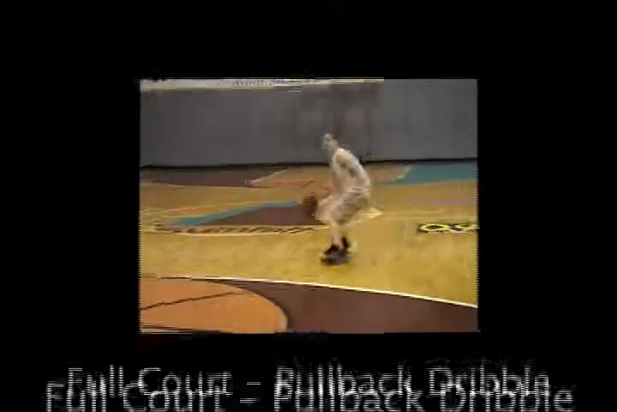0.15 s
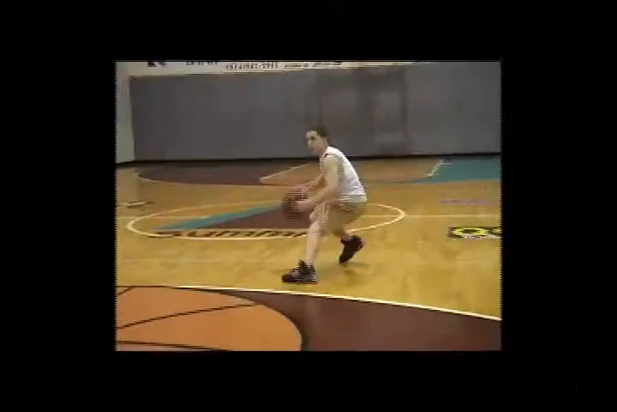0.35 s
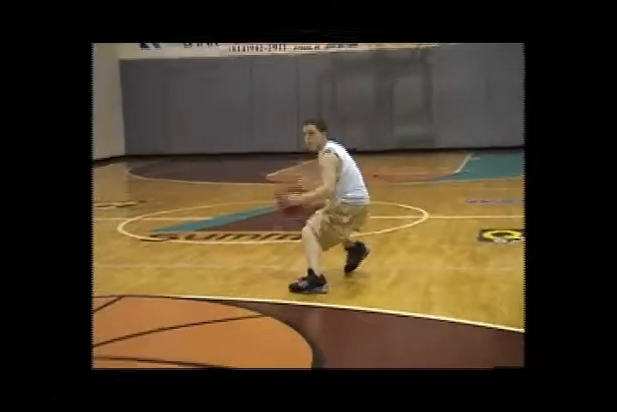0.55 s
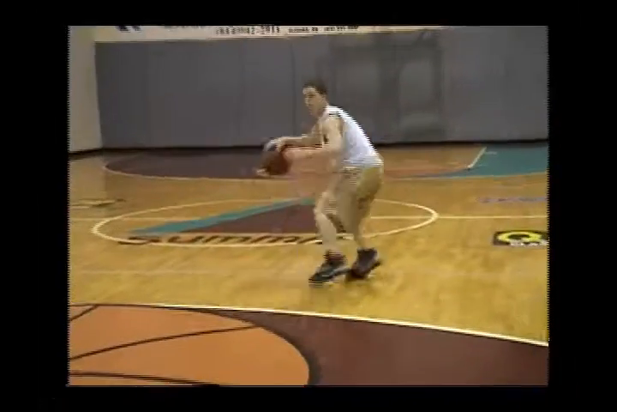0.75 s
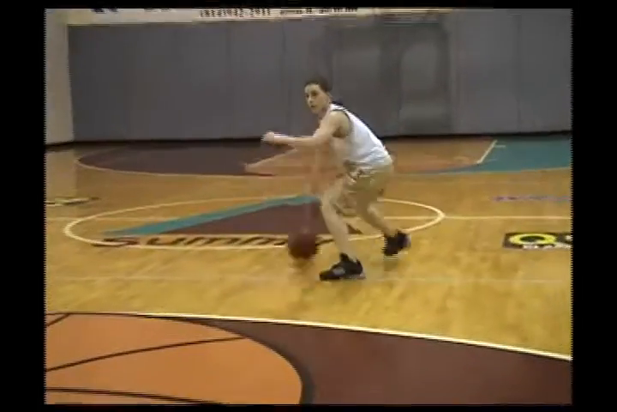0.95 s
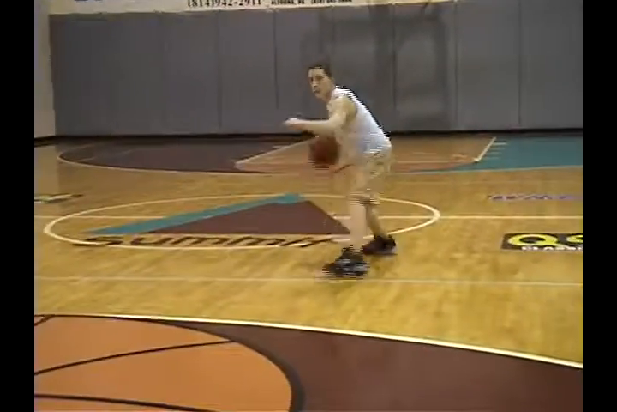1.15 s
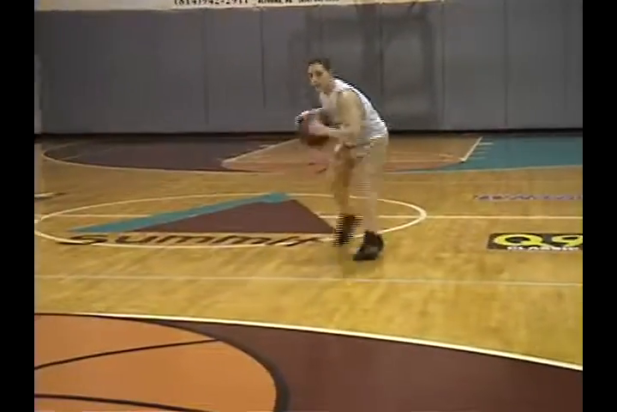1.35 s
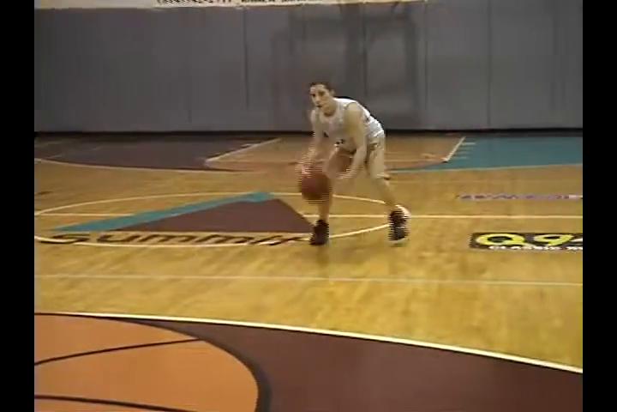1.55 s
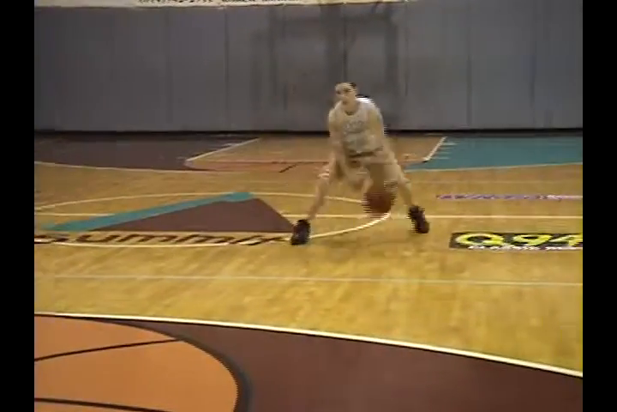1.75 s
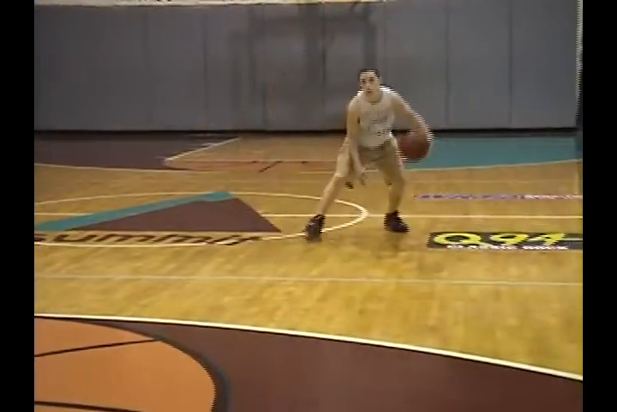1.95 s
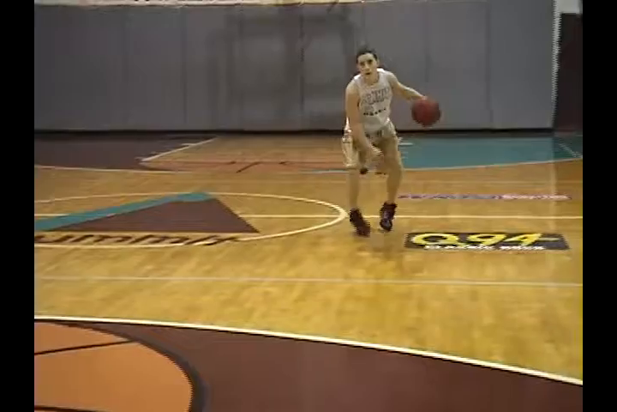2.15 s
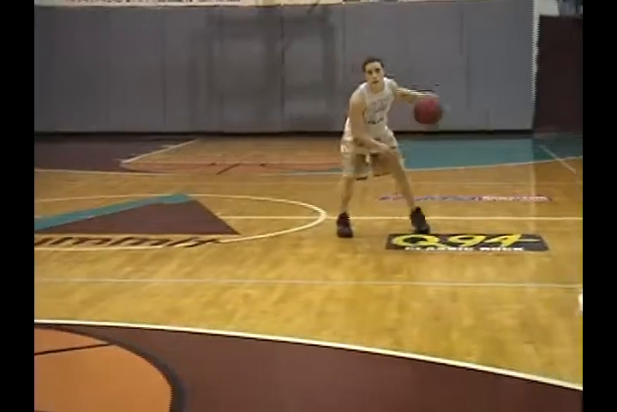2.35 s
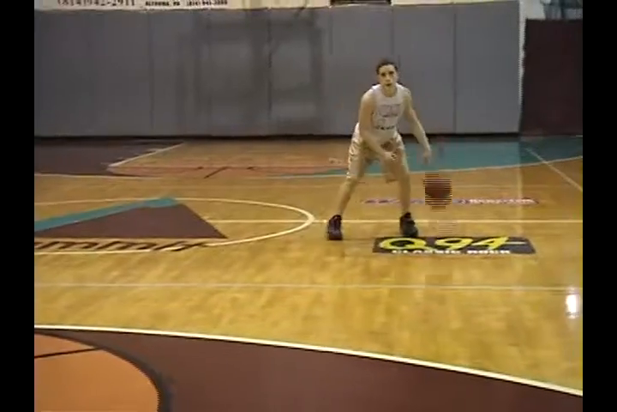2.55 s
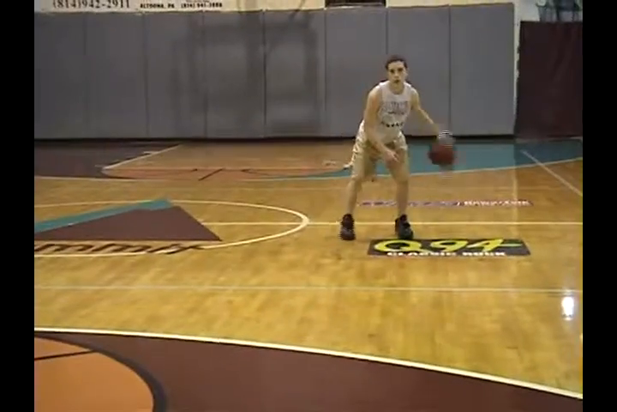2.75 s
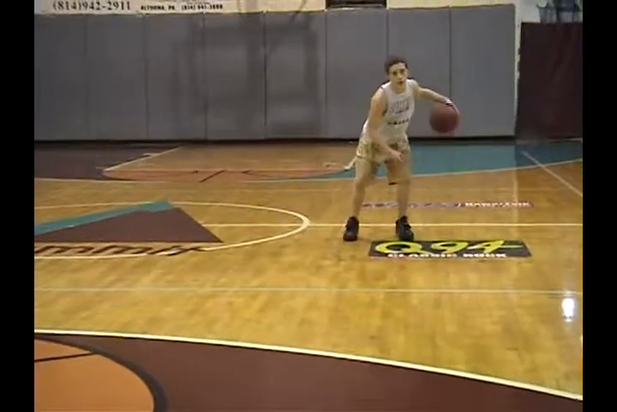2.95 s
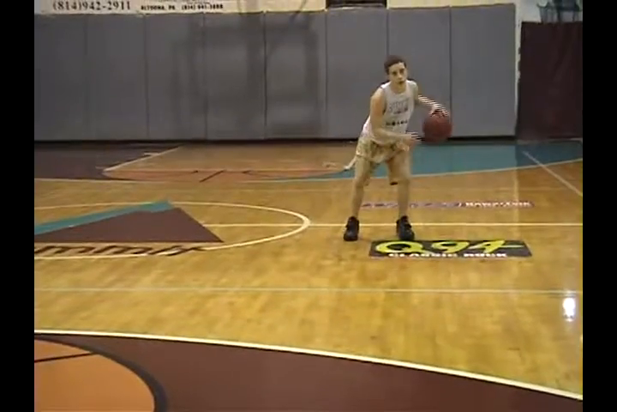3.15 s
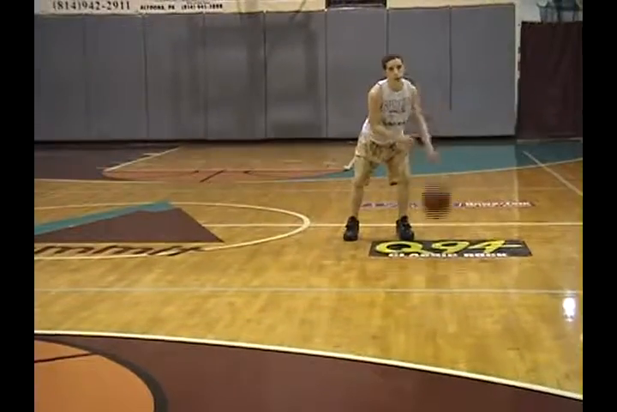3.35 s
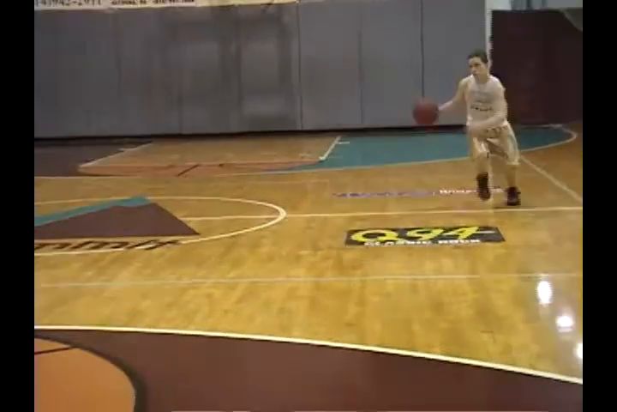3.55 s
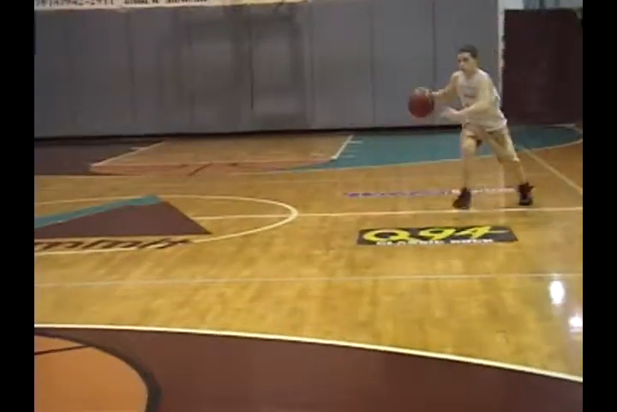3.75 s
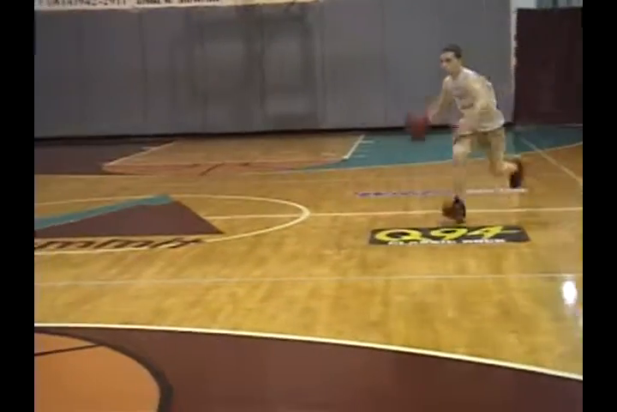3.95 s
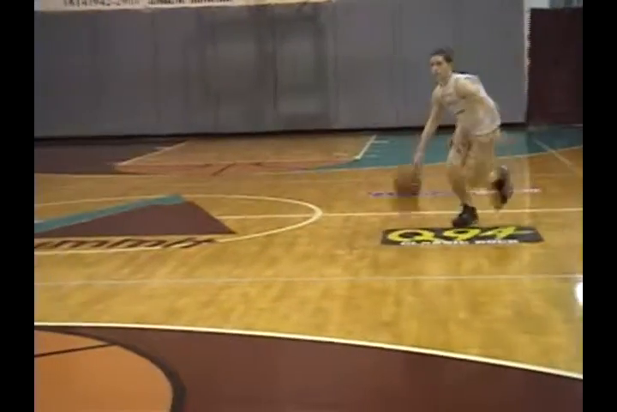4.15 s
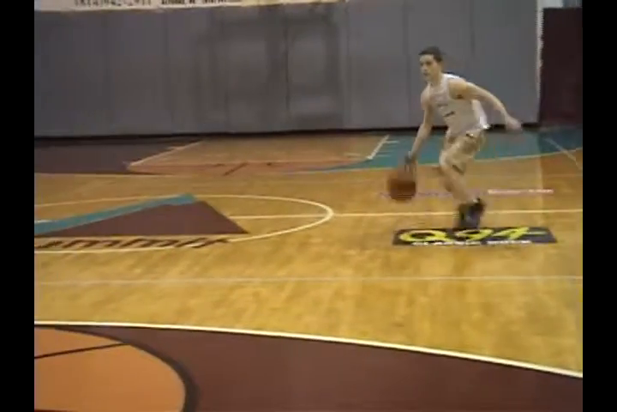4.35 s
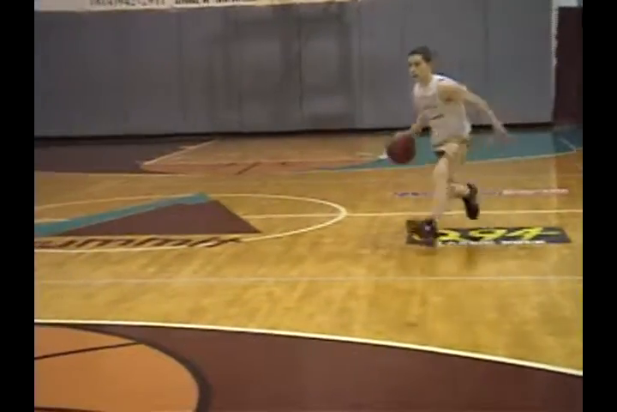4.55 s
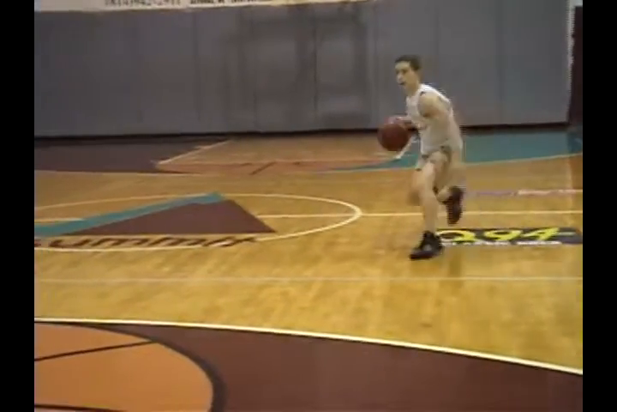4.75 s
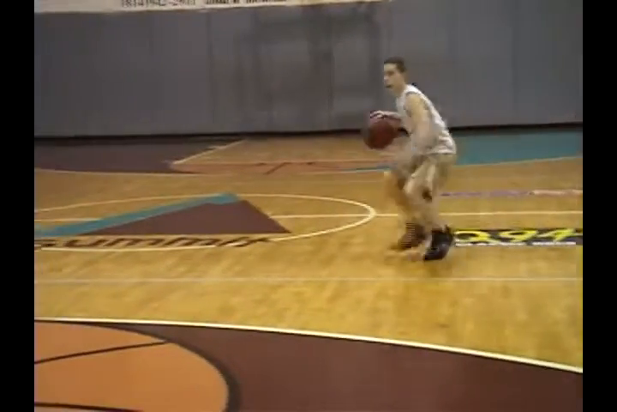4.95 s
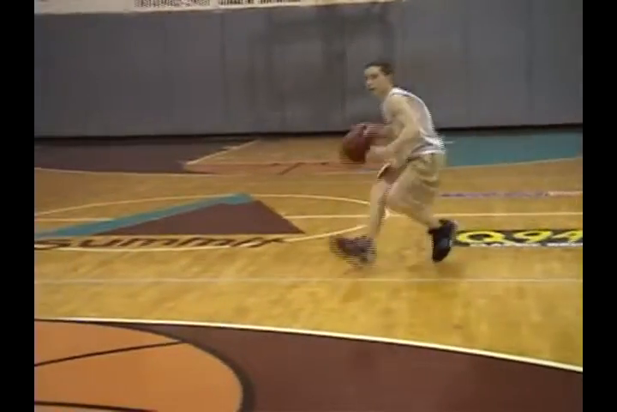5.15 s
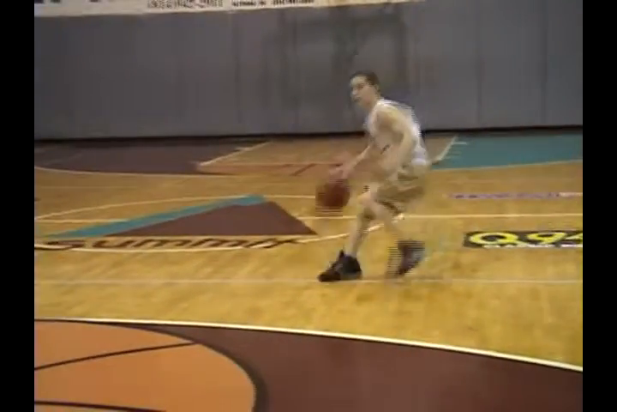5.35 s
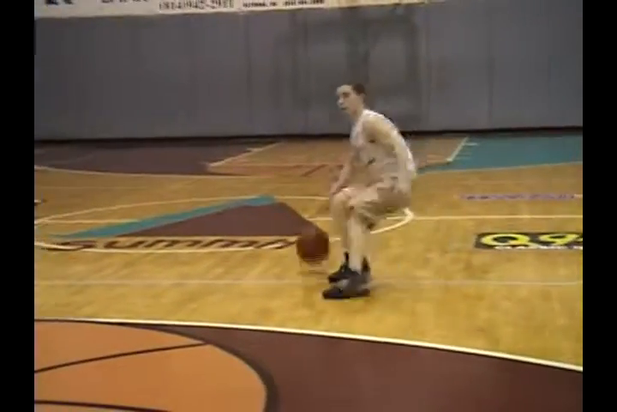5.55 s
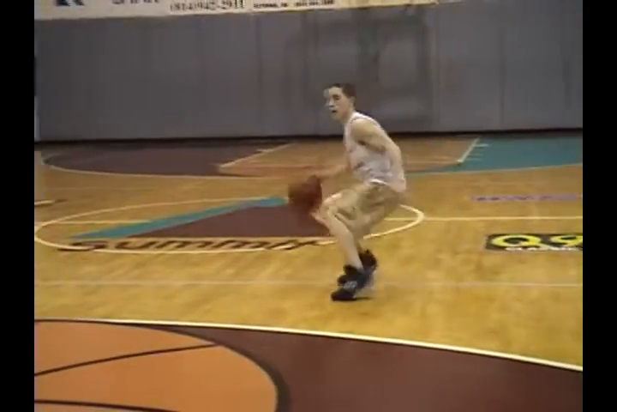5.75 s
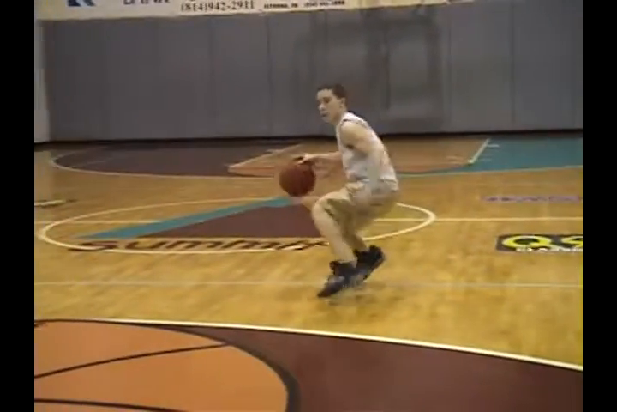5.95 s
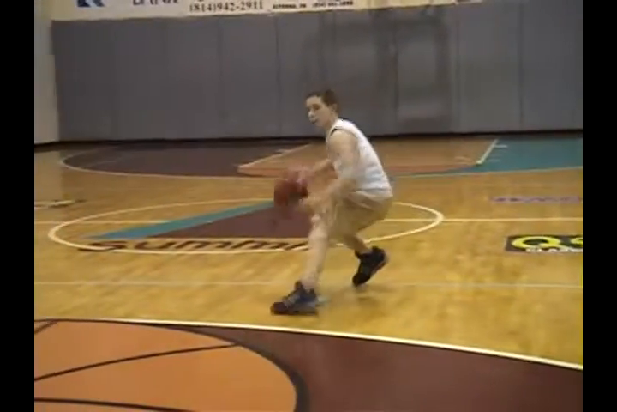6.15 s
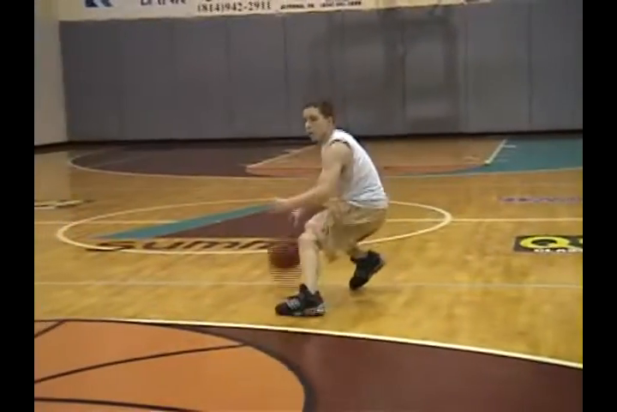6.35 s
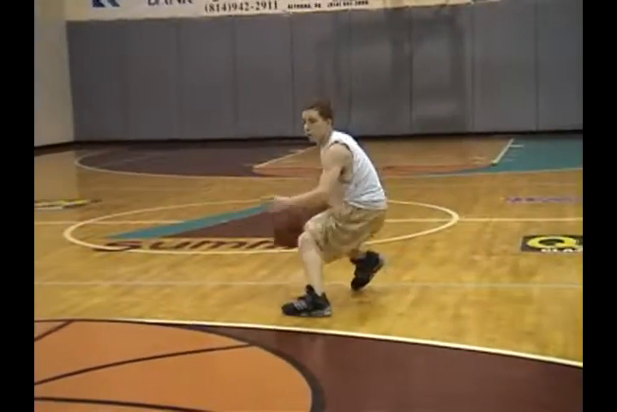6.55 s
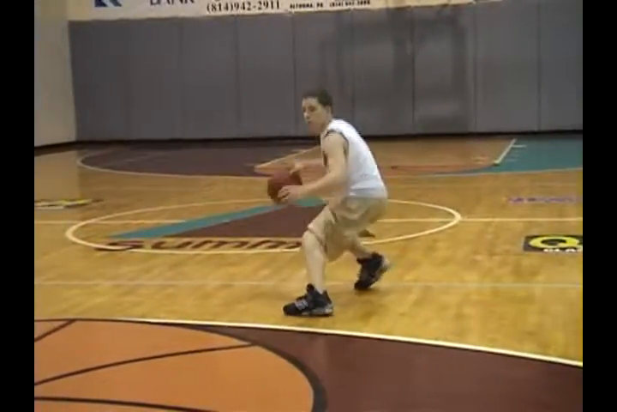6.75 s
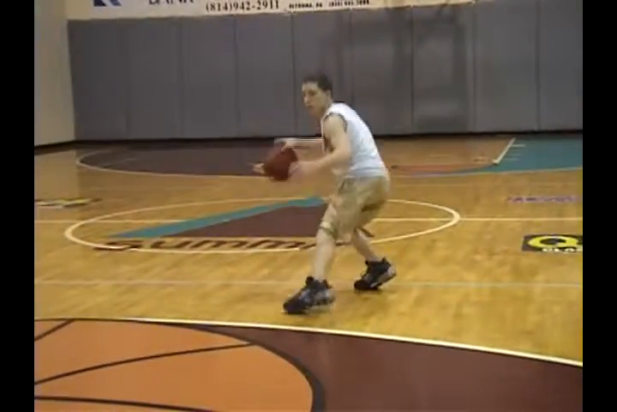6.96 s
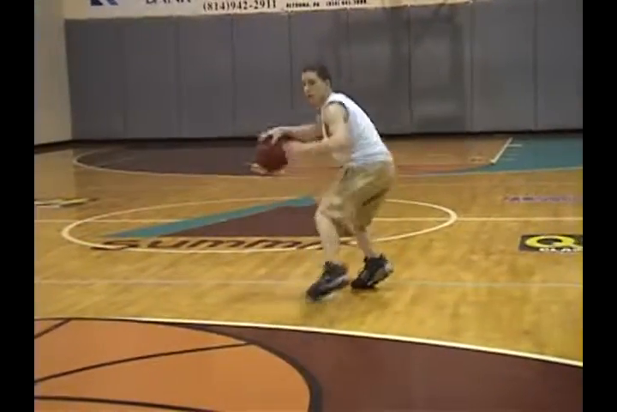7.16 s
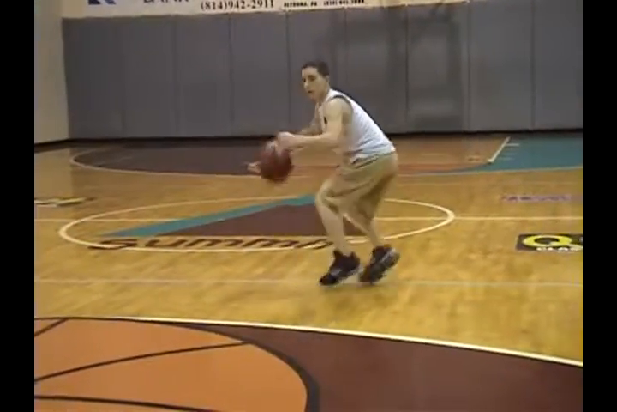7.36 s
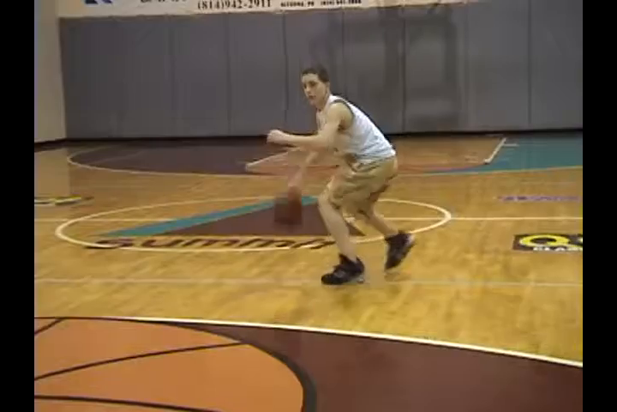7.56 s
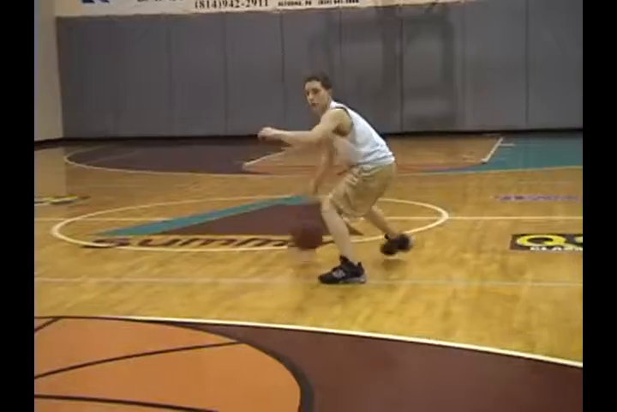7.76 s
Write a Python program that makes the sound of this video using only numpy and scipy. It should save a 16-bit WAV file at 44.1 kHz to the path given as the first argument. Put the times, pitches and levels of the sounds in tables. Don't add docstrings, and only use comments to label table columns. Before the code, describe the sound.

In a large hard-walled gym, a basketball hits sprung hardwood six times at uneven intervals, each a hard slap with low thump, hollow ring, wall slapback and long tail. Shoes tap and briefly squeak near the start. Ventilation rushes under a thin camera whine. Partway through, everything cuts to slow motion: deeper, much quieter, stretched bounces and shoe scuffs. The camera microphone slightly overloads on loud hits.

```python
import sys
import numpy as np
from scipy import signal
from scipy.io import wavfile

SR = 44100
rng = np.random.default_rng(int(sys.argv[2]) if len(sys.argv) > 2 else 0)


def dump(signal):
    limited = np.clip(np.atleast_2d(signal).T, -1, 1)
    pcm = np.round(limited * 32767).astype(np.int16)
    wavfile.write(sys.argv[1], SR, pcm)


def boost(x):
    u = np.asarray(x, float) / 20
    return 10 ** u


N = 344862

CUT_S, LEAD_S = 3.6122, .8
SPEED, SLOW_AT_S, SAME_AS_S = .4005, 5.6757, .1866
M = round((CUT_S + LEAD_S) * SR)
MODE_SPREAD_DB = 2.5

# (time [s], slap peak [dB], thump [dB], top [dB], delay of the nearest big wall [s])
BOUNCES = [
    (0.187, -1.5, -11.5, -18, .0377),
    (0.5408, -2.5, -17.5, -19.5, .0377),
    (1.0624, -1.5, -17, -21, .0358),
    (1.7802, -6.5, -19.5, -23, .0367),
    (2.7184, -3.5, -15, -16, .0408),
    (3.5114, -1.5, -18, -21, .0400),
]
# (time [s], slap peak [dB], thump [dB], top [dB], wall delay [s])
SLOW_BOUNCES = [
    (3.300, -1, -14.5, -18, .039),
    (4.402, 2, -11.5, -16.5, .0394),
]


def live_time(s):
    return SAME_AS_S + (s - SLOW_AT_S) * SPEED


def merged(rows, slow_rows):
    table = np.array([(live_time(s), *rest) for s, *rest in slow_rows] + list(rows))
    at = np.round((table[:, 0] + LEAD_S) * SR).astype(int)
    return (at, *table[:, 1:].T)


def clicks(at, db):
    out = np.full(M, 1e-18)
    out[at] += boost(db)
    return out


def at_hz(points, hz):
    points = np.array(points)
    return np.interp(np.log(hz), np.log(points[:, 0]), points[:, 1])


def band(x, low_hz, high_hz):
    return signal.sosfilt(signal.butter(2, [low_hz, min(high_hz, .45 * SR)], "band", fs=SR, output="sos"), x)


def fading(x, t60):
    return signal.lfilter([1], [1, -boost(-60 / (t60 * SR))], x)


def struck(at, db, modes, spread_db):
    out = 0
    chance = rng.standard_normal((len(at), len(modes)))
    for k, (hz, mode_db, t60) in enumerate(modes):
        r, w = boost(-60 / (t60 * SR)), 2 * np.pi * hz / SR
        blows = clicks(at, db + mode_db + spread_db * chance[:, k])
        out = out + signal.lfilter([0, np.sin(w)], [1, -2 * r * np.cos(w), r * r], blows)
    rubber_hz = 5000
    return signal.lfilter(*signal.butter(2, rubber_hz, fs=SR), out)


def bank(shape):
    out = 0
    white = rng.standard_normal((2, M))
    edges = 22 * 2 ** np.arange(0, 9.8, 1 / 3)
    for k, (low, high) in enumerate(zip(edges, edges[1:])):
        out = out + shape(np.sqrt(low * high)) * band(white[k % 2], low, high)
    return out


def background():
    # (frequency [Hz], density [dB per Hz])
    ventilation = [(12, -34), (20, -8.5), (161, 1.5), (232, 2), (289, -3), (352, 0), (404, -8), (505, -4.5),
                   (2540, -28.5), (4190, -31), (4810, -43), (6720, -31.5), (7520, -39), (15500, -49.5)]
    # (frequency [Hz], width [Hz], level [dB])
    hums = [
        (117, 3, -45),
        (6600, 500, -68),
        (15625, 8, -83),
    ]
    # (frequency [Hz], level [dB rms])
    whine = [(4043, -65), (4544, -70.5), (5760, -74), (6239, -67), (6422, -75.5), (6481, -68.5),
             (6718, -81), (6842, -74)]
    ventilation_db = -33.5
    out = bank(lambda hz: boost(at_hz(ventilation, hz)))
    out = boost(ventilation_db) * out / np.std(out)
    for hz, width, db in hums:
        hum = band(rng.standard_normal(M), hz - width / 2, hz + width / 2)
        out += boost(db) * hum / np.std(hum)
    for hz, db in whine:
        out += boost(db + 4.5) * np.sin(2 * np.pi * (hz * np.arange(M) / SR + rng.random()))
    return out


def bursts():
    # (time [s], peak [dB], knock [dB], top [dB], length [s])
    steps = [
        (.105, -5.5, -20, -18, 0.0008),
        (.110, -9.5, -11.5, -24, 0.0025),
        (.4245, -14, -28, -33.5, 0.0004),
        (.430, -30, -39, -39, 0.012),
        (.452, -19, -44.5, -51, 0.0042),
        (1.025, -14.5, -19.5, -42, 0.0033),
    ]
    # (time [s], peak [dB], knock [dB], top [dB], length [s])
    slow_steps = [
        (3.917, -31, -37, -50, 0.002),
        (4.483, -11, -30, -42, 0.0014),
        (4.590, -15.5, -30, -43, .012),
        (4.632, -12.5, -24, -46, .016),
        (4.756, -16, -24, -48, 0.007),
        (4.836, -10, -15, -14, 0.0016),
        (4.843, -13, -8, -24, 0.003),
        (4.899, -36.5, -34, -35, 0.001),
        (4.936, -4, -22, -32, .001),
        (5.093, -20, -22, -42, 0.0025),
    ]
    # (peak [dB], knock [dB], top [dB], hall [dB], length [s])
    second_trip = (-19, -29, -35, -33, .005)
    far_wall = (-21, -28, -33, -30, .012)
    second_trip_lag, far_wall_s = 1.92, .089
    facing_s, aside_db_per_ms = .040, 3
    knock_hall_db, scuff_hall_db = -14, -10
    step_wall_s, peak_loss_db, knock_loss_db, top_loss_db = .0398, 8, 14, 15

    at, peak_db, knock_db, top_db, length = merged(steps, slow_steps)
    knock_energy = boost(2 * (knock_db + knock_hall_db))
    scuff_energy = boost(2 * (peak_db + scuff_hall_db)) * (length / .01) ** 2
    hall_db = 10 * np.log10(knock_energy + scuff_energy)
    rows = list(zip(at, peak_db, knock_db, top_db, hall_db, length))
    rows += zip(at + step_wall_s * SR, peak_db - peak_loss_db, knock_db - knock_loss_db,
                top_db - top_loss_db, hall_db - knock_loss_db, length)
    for i, slap_db, _, _, wall_s in zip(*merged(BOUNCES, SLOW_BOUNCES)):
        aside_db = aside_db_per_ms * min(wall_s - facing_s, 0) * 1000
        returns = [(second_trip_lag * wall_s, slap_db + aside_db, second_trip), (far_wall_s, slap_db, far_wall)]
        for lag_s, db, (*below_db, smear_s) in returns:
            rows.append((i + lag_s * SR, *(db + np.array(below_db)), smear_s))
    at, *columns = np.transpose(rows)
    return at.astype(int), *columns


def shoes():
    # (frequency [Hz], level [dB], t60 [s])
    sole_modes = [(230, 2.5, 0.065), (485, 3, .03), (907, 6.5, 0.023), (1535, -1, .015)]
    at, peak_db, knock_db, top_db, hall_db, length = bursts()
    mid = band(band(rng.standard_normal(M), 1200, 5740), 1200, 5740)
    top = band(band(rng.standard_normal(M), 5500, 11000), 5500, 11000)
    out = struck(at, knock_db, sole_modes, MODE_SPREAD_DB)
    for i, mid_db, bright_db, s in zip(at, peak_db, top_db, length):
        u = np.arange(min(round(.06 * SR), M - i)) / SR / max(s, .0003)
        contact = np.exp(-u ** 2) * np.minimum(1, 11.0 * u + .3)
        span = slice(i, i + len(u))
        out[span] += contact * (boost(mid_db) * mid[span] + boost(bright_db) * top[span])
    return out, clicks(at, 2 * hall_db)


def ball():
    # (frequency [Hz], level [dB], t60 [s])
    thump_modes = [(132, -12.5, 0.11), (164, -9, 0.1), (205, -9, 0.061), (256, -6, .08), (307, -13, .05),
                   (440, -18, 0.032)]
    # (frequency [Hz], level [dB], t60 [s])
    air_modes = [(540, -4, 0.016), (700, -9.5, .015), (890, -5, .02), (1120, -3, 0.05), (1320, 0, 0.016),
                 (1764, -1, .015), (2000, -6, .012), (2440, -3.5, .012), (3200, -8.5, 0.013),
                 (3800, 0.5, 0.0045)]
    # (delay [s], level [dB])
    boom_echoes = [(0.015, -9.5), (.078, -11), (.096, -9.5), (.112, -11), (0.151, -13), (0.194, -13.5)]
    wall_loss_db = np.array([2.5, 6, 17, 4])
    wall_ring_loss_db = 4
    contact_hz = 200
    thump_lag_s = .0014
    near_echo_s, near_echo_db, echo_top_hz = .0115, -9, 6200
    wall_near_echo_db = -8
    hall_under_slap_db = 23

    hit, slap_db, thump_db, top_db, wall_s = merged(BOUNCES, SLOW_BOUNCES)
    direct = np.array([slap_db, thump_db, top_db, slap_db - hall_under_slap_db])
    at = np.r_[hit, hit + np.round(wall_s * SR).astype(int)]
    slap_db, thump_db, top_db, hall_db = np.c_[direct, direct - wall_loss_db[:, None]]
    is_return = np.arange(len(at)) >= len(hit)

    slap = band(band(clicks(at, slap_db + 7), 750, 4100), 470, 7700)
    rattle_noise = band(band(rng.standard_normal(M), 500, 4500), 430, 6500)
    rattle = fading(clicks(at, slap_db - 7.5), 0.015) * rattle_noise
    crackle_noise = band(band(rng.standard_normal(M), 5500, 12000), 5500, 13000)
    crackle = fading(clicks(at, top_db + 7), 0.014) * crackle_noise
    ring = struck(at, slap_db - 9 - wall_ring_loss_db * is_return, air_modes, MODE_SPREAD_DB)
    bright = slap + rattle + crackle + ring

    push = struck(at + round(thump_lag_s * SR), thump_db + 14, thump_modes, MODE_SPREAD_DB / 2)
    thump = -signal.lfilter(*signal.butter(2, contact_hz, fs=SR), push)
    thump = thump + sum(boost(db) * np.r_[np.zeros(round(s * SR)), thump][:M] for s, db in boom_echoes)

    lag = round(near_echo_s * SR)
    order = np.searchsorted(np.sort(at), np.arange(M), "right") - 1
    latest = np.argsort(at)[np.maximum(order, 0)]
    facing = bright * np.where(latest < len(hit), 1, boost(wall_near_echo_db))
    echo = band(np.r_[np.zeros(lag), facing[:-lag]], 300, echo_top_hz)
    return bright + thump - boost(near_echo_db) * echo, clicks(at, 2 * hall_db)


def hall(energy):
    # (frequency [Hz], density [dB per Hz])
    hall_colour = [(30, -39), (60, -8.5), (100, -1.5), (140, -0.5), (240, -1.5), (300, -11), (420, -9),
                   (600, -10), (830, -15), (1110, -12.5), (1600, -16), (3400, -23.5), (10300, -42),
                   (14500, -67)]
    # (frequency [Hz], t60 [s])
    hall_t60 = [(60, 3.3), (160, 1.2), (420, 1.5), (1100, 2.22), (2900, 2.8), (7700, 1.4), (11000, 0.23),
                (14000, 0.35)]
    build_up_s, early_t60_s, early_db = 0.047, 0.56, 2
    clump_hz, clump_db = 67, 2.5
    filled = fading(energy, build_up_s * np.log(1000)) / (build_up_s * SR)
    clumps = band(rng.standard_normal(M), 4.1, clump_hz)
    lumpy = boost(2 * (early_db + clump_db * clumps / np.std(clumps)))
    early = lumpy * fading(filled, early_t60_s / 2)

    def gain(hz):
        return boost(at_hz(hall_colour, hz)) * np.sqrt(early + fading(filled, at_hz(hall_t60, hz) / 2))

    return boost(18.5) * bank(gain)


def squeak():
    partials_db = [1, 0, 0, -8]
    start_s, length_s = .4516, .0066
    first_hz, last_hz, level_db = 2750, 1945, -19
    u = np.arange(round(length_s * SR)) / (length_s * SR)
    roughness_hz = 1100 * rng.standard_normal(len(u))
    phase = 2 * np.pi * np.cumsum(first_hz + (last_hz - first_hz) * u + roughness_hz) / SR
    tone = sum(boost(db) * np.sin((k + 1) * phase) for k, db in enumerate(partials_db))
    out = np.zeros(M)
    i = round((start_s + LEAD_S) * SR)
    out[i:i + len(u)] = boost(level_db) * np.sin(np.pi * u ** .7) * tone
    return band(band(out, 1800, 11000), 1800, 11000)


def scene():
    mic_low_hz, top_hz, slow_db = 97, 15900, -15
    bounces, ball_energy = ball()
    footwork, shoe_energy = shoes()
    played = bounces + footwork + squeak() + hall(ball_energy + shoe_energy)
    gym = signal.sosfilt(signal.butter(2, mic_low_hz, "high", fs=SR, output="sos"), played) + background()
    gym = 1.108 * np.tanh(gym / 1.094)
    gym = signal.sosfilt(signal.cheby2(10, 60, top_hz + 1300, fs=SR, output="sos"), gym)
    s = np.arange(N) / SR
    slowed = s >= CUT_S
    fine = signal.resample_poly(gym, 4, 1)
    read = 4 * SR * (LEAD_S + np.where(slowed, live_time(s), s))
    return (np.interp(read, np.arange(len(fine)), fine) * np.where(slowed, boost(slow_db), 1))[None]


def thinned(x):
    thin_from_hz, thin_below_db, thin_spread_db = 4800, -54.5, 2.5
    smear_db = -18
    sharp_db, blow_top_hz = 8, 14900
    hz, _, spec = signal.stft(x, SR, nperseg=4096)
    spec, hz = spec[:2048], hz[:2048, None]
    power = np.abs(spec) ** 2
    bands = power.reshape(128, 16, -1).sum(axis=1)
    judged = bands * boost(2 * thin_spread_db * rng.standard_normal(bands.shape))
    judged = judged.repeat(16, axis=0)
    error = rng.standard_normal(spec.shape) + 1j * rng.standard_normal(spec.shape)
    smear = boost(smear_db) * np.sqrt(bands.repeat(16, axis=0) / 32) * error
    spec = spec + (hz > thin_from_hz) * smear
    treble = power[hz[:, 0] > 12000].sum(axis=0) + 1e-12
    calm = np.r_[1, treble[1:] / treble[:-1]] < boost(2 * sharp_db)
    faint = judged < boost(2 * thin_below_db) * power.sum(axis=0)
    weak = (faint & calm) | (~calm & (hz > blow_top_hz))
    spec = np.r_[spec * ~(weak & (hz > thin_from_hz)), 0 * spec[:1]]
    return signal.istft(spec, SR, nperseg=4096)[1][:N]


def low_pass(x):
    return signal.sosfilt(signal.butter(12, 15950, fs=SR, output="sos"), x)


def record(dry):
    mix = thinned(dry[0])[None]
    return low_pass(mix)


dry = scene()
out = record(dry)
dump(out)
```